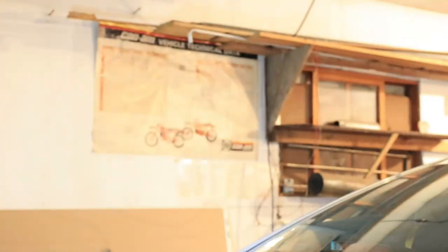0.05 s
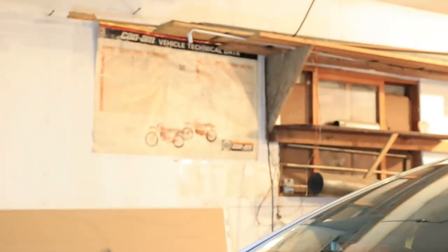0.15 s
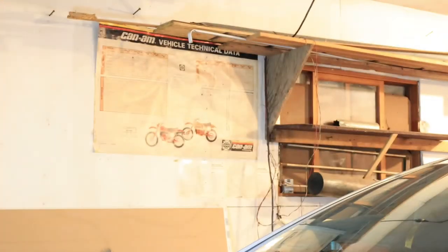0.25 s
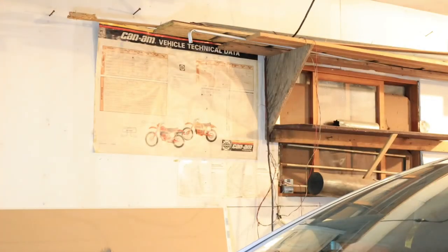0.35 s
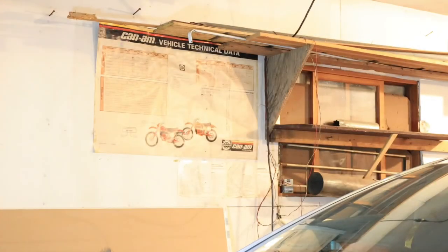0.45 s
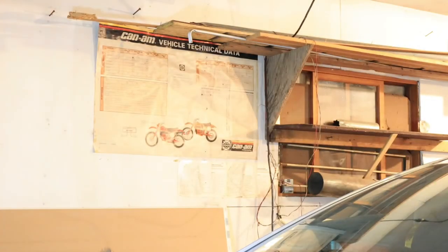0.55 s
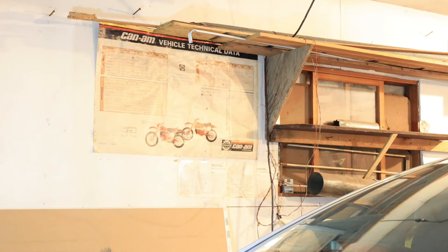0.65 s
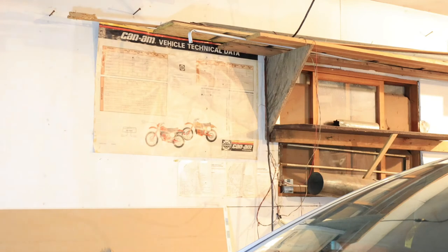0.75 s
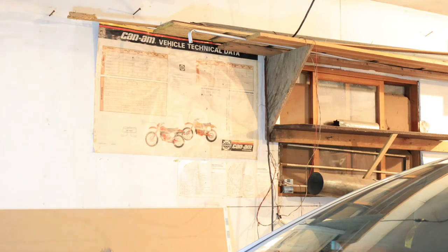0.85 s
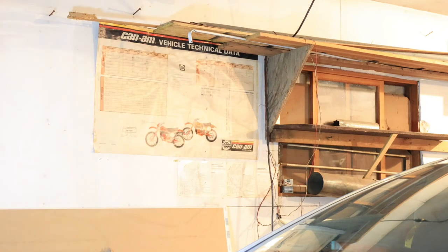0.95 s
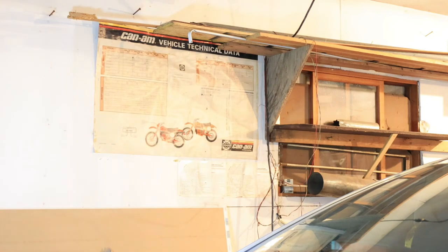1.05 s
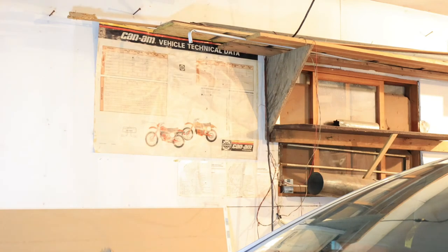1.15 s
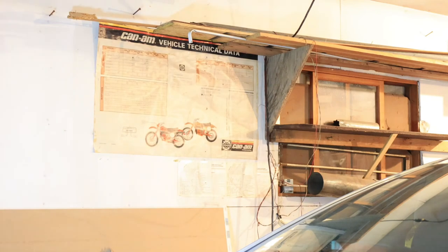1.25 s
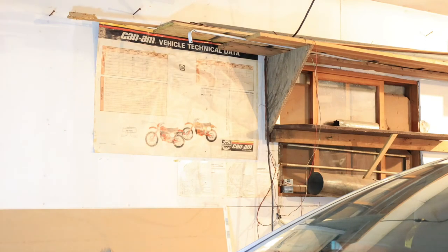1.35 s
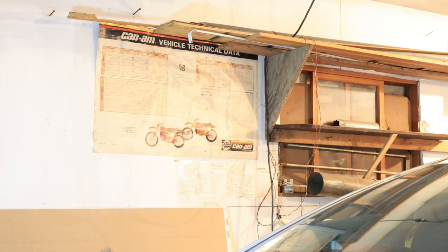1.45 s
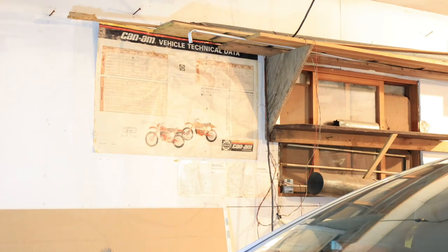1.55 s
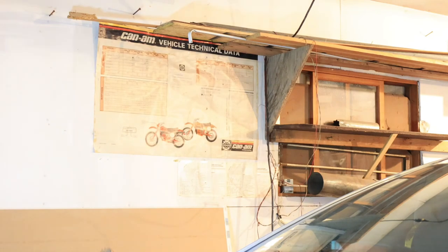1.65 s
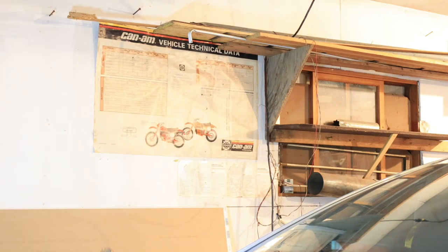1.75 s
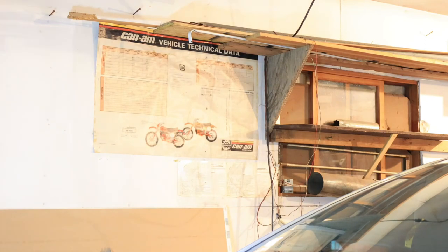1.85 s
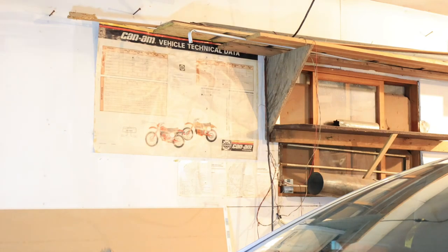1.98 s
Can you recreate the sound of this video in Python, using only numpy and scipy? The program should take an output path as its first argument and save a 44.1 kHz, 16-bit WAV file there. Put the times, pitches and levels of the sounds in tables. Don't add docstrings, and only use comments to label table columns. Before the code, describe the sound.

A car trunk lid falls with a faint airy rush and a tiny hinge tick, then slams at about 0.2 s: deep thud, hard latch clunk, boomy trapped air. Loose trim rattles in quick pairs until about 0.5 s while panels and the hard-walled garage ring out by 1 s. Afterwards, quiet street murmur, distant engine hum, faint blurred birds and tiny rustles. Left channel only; right holds faint hiss.

```python
import sys
import numpy as np
from scipy import signal
from scipy.fft import rfft, irfft
from scipy.io import wavfile
from scipy.ndimage import uniform_filter1d

SR = 44100
rng = np.random.default_rng(int(sys.argv[2]) if len(sys.argv) > 2 else 0)


def digitize_waveform(pressure):
    field = np.atleast_2d(pressure).T
    bounded = np.clip(field, -1, 1)
    quanta = np.round(bounded * 32767).astype(np.int16)
    wavfile.write(sys.argv[1], SR, quanta)


def gain_from_decibels(decibels):
    exponent = np.asarray(decibels, float) / 20
    return 10 ** exponent


N = 88200
T = np.arange(N) / SR
FREQS = np.maximum(np.fft.rfftfreq(N, 1 / SR), 1)


def unit(x):
    return x / np.sqrt(np.mean(x ** 2))


def colour(x, points):
    hz, db = np.array(points, float).T
    gain = gain_from_decibels(np.interp(np.log(FREQS), np.log(hz), db))
    return irfft(rfft(x) * gain, N)


def noise(points):
    return unit(colour(rng.standard_normal(N), points))


def narrow(hz, width_hz):
    resonance = 1 + ((FREQS - hz) / (width_hz / 2)) ** 2
    return unit(irfft(rfft(rng.standard_normal(N)) / resonance, N))


def walk(rate_hz):
    size = int(SR / rate_hz)
    wander = uniform_filter1d(uniform_filter1d(rng.standard_normal(N), size), size)
    return wander / wander.std()


def follow(points):
    times, db = np.array(points, float).T
    return np.interp(T, times, db)


def fade(start, t60, rise):
    since = np.maximum(T - start, 0)
    return (1 - np.exp(-since / rise)) * gain_from_decibels(-60 * since / t60)


def ring(modes):
    return sum(gain_from_decibels(db) * np.sin(2 * np.pi * hz * T) * gain_from_decibels(-60 * T / t60) for hz, db, t60 in modes)


def conv(a, b):
    return signal.fftconvolve(a, b)[:N]


# pitch_hz, level_db (per Hz)
MURMUR = [(15, -51.5), (25, -10.5), (86, -8.5), (194, -10.5), (236, -17), (364, -14.5), (464, -17),
          (1310, -24.5), (8000, -45), (10400, -64.5), (17600, -120)]
# start_s, level_db
MURMUR_SWELL = [(0, 3.5), (.8, 8.5), (0.999, 3), (1.2, -0.5), (1.45, -2.5), (1.649, 3.5), (1.8, -0.5),
                (2, 0)]


def street_murmur():
    return noise(MURMUR) * gain_from_decibels(-65 + follow(MURMUR_SWELL) + 1.1 * walk(12))


# start_s, level_db
ENGINE_HUM = [(0, -85.5), (.45, -80), (.62, -62), (.95, -69.5), (1.2, -78.5), (1.44, -67), (1.6, -75),
              (1.68, -68), (1.8, -62.5), (1.93, -71), (2, -74)]


def engine_hum():
    return narrow(83, 14) * gain_from_decibels(follow(ENGINE_HUM) + 4)


# pitch_hz, level_db, width_hz
BIRD_NOTES = [(3610, -64.5, 510), (4360, -69, 800), (1830, -62, 350), (1330, -60, 217), (535, -56, 150),
              (556, -53.5, 82), (308, -58, 112), (4100, -68, 310), (3750, -71, 300), (3230, -69.5, 340),
              (2600, -72.5, 640), (1152, -70.5, 900), (280, -58.5, 240), (187, -57.5, 78), (1320, -62, 127),
              (526, -41, 220), (670, -43, 53), (166, -49, 70)]
# start_s, length_s
BIRD_SPANS = [(.66, .3), (.68, .27), (.789, .12), (.808, .1), (.785, .09), (.968, .05), (1.612, .045),
              (1.769, .07), (1.783, .12), (1.805, .11), (.7, .2), (1.6, .12), (.783, .03), (.99, .1),
              (.96, .09), (.485, .17), (.52, .07), (.52, .07)]


def birds():
    rise_s, flutter_db = 0.006, 1.5
    out = 0
    for (start, length), (hz, db, width_hz) in zip(BIRD_SPANS, BIRD_NOTES):
        flutter = gain_from_decibels(db + flutter_db * walk(29.6))
        release = np.clip((start + length - T) / (3 * rise_s), 0, 1)
        out = out + flutter * narrow(hz, width_hz) * fade(start, length * 7, rise_s) * release
    return out


# pitch_hz, t60_s
ROOM_DECAY = [(30, 0.76), (120, 0.31), (200, 0.6), (400, 0.7), (1500, 0.75), (4000, 0.67), (8000, 0.16),
              (15000, 0.3)]


def garage():
    hz_points, t60_points = np.array(ROOM_DECAY).T
    spectrum = rfft(rng.standard_normal(N))
    tail = 0
    for hz in 25 * 2 ** np.arange(0, 9.5, 0.5):
        weight = np.maximum(1 - abs(np.log2(FREQS / hz)) * 2, 0)
        t60 = np.interp(np.log(hz), np.log(hz_points), t60_points)
        tail = tail + irfft(spectrum * weight, N) * fade(0.0033, t60, 0.01)
    return tail / np.linalg.norm(tail)


# start_s, level_db
LID_FALL = [
    (0.0, -60),
    (0.022, -63),
    (0.042, -61.5),
    (0.148, -53),
    (0.16, -52.5),
]
# pitch_hz, width_hz, level_db
LID_AIR = [(300, 900, 4), (900, 1200, 1.5), (1700, 490, -11.5), (2290, 570, -9), (3320, 1000, -2.5),
           (4000, 280, -18)]


def falling_lid():
    air = unit(sum(gain_from_decibels(db) * narrow(hz, width_hz) for hz, width_hz, db in LID_AIR))
    stop = np.clip((0.19 - T) / 0.027, 0, 1)
    knock = gain_from_decibels(-48.5 - 60 * T / 0.36) * np.sin(2 * np.pi * 124 * T - 1.6)
    return air * gain_from_decibels(follow(LID_FALL) + 0.5) * stop + knock


# start_s, level_db (peak), t60_s
TICK_TIMES = [
    (0.043, -48.5, 0.036),
    (1.987, -58.5, 0.028),
]
# pitch_hz, level_db (per Hz)
TICK_COLOUR = [(1500, -25.5), (3000, 3), (4200, 2.5), (5500, -15), (7500, -6.5), (15000, -11)]


def ticks():
    return noise(TICK_COLOUR) * sum(gain_from_decibels(db) * fade(s, t60, 0.0003) for s, db, t60 in TICK_TIMES)


# pitch_hz, width_hz, level_db, t60_s
AFTERRING_BANDS = [(165, 30, -25, .7), (255, 40, -25.5, .85), (514, 50, -29, .9), (660, 130, -32.5, .85),
                   (895, 50, -33.5, 1), (1036, 45, -35.5, .7), (72, 15, -28.5, 0.46)]


def afterring():
    return sum(gain_from_decibels(db) * narrow(hz, width_hz) * fade(0.13, t60, 0.06)
               for hz, width_hz, db, t60 in AFTERRING_BANDS)


# pitch_hz, level_db, rise_s, t60_s
CAVITIES = [(30.3, -9.5, .03, 0.33), (62.2, -19.5, 0.024, 0.43), (118.37, -18.5, 0.02, 0.47),
            (168.84, -6.5, .08, 0.28), (250, -10.5, 0.059, .25), (345, -11, 0.03, 0.18),
            (406.6, -15.5, 0.033, 0.2)]


def cavity_boom():
    out = 0
    for hz, db, rise, t60 in CAVITIES:
        tone = np.sin(2 * np.pi * hz * T + 0.43 * walk(13))
        out = out + gain_from_decibels(db) * fade(0.18, t60, rise) * tone
    return out


# pitch_hz, level_db (per Hz)
SHUDDER_COLOUR = [(25, -21.5), (100, -13), (200, -8), (400, -11), (691, -20), (856, -14.5), (3630, -28),
                  (15000, -58.5)]


def panel_shudder():
    roughness = gain_from_decibels(-14 + 2 * walk(84))
    return noise(SHUDDER_COLOUR) * roughness * fade(0.181, 0.45, 0.0089)


# start_s, level_db (peak), rise_s, t60_s, brightness_db
LATCH_CRACKS = [(0.1642, -36, 0.0017, .06, -21.5), (.169, -37.5, 0.0067, .08, -6.5),
                (.178, -15.5, 0.0034, 0.033, -8.5), (.1855, -11.5, .0015, .035, 6.5),
                (.192, -23.5, 0.0014, 0.05, -0.5), (.200, -16.5, 0.0053, 0.034, 7.5),
                (.211, -21.5, .002, 0.075, 1), (.2412, -18.5, 0.00097, 0.035, 11),
                (.254, -24, .001, 0.012, 6), (.2962, -20.5, .0006, 0.022, 10),
                (.306, -27.5, .0006, 0.038, 8.5), (.348, -24, 0.0011, 0.028, 7.5),
                (.3565, -24.5, .001, 0.033, 5), (.396, -34.5, .001, 0.02, 8),
                (.417, -35, 0.0011, 0.027, -20), (.444, -39.5, 0.0012, 0.017, 2.5),
                (.485, -43.5, .001, 0.031, 4.5), (0.5221, -47, 0.00062, 0.023, 4.5),
                (0.527, -41.5, 0.0026, 0.052, -4.5), (.975, -56, 0.0097, 0.12, 7.5),
                (1.10, -64.5, 0.0089, 0.0908, -9), (1.265, -65.5, 0.0088, 0.14, -1),
                (1.52, -65, 0.0083, 0.048, -15), (1.69, -69.5, 0.0078, 0.097, 5)]
# pitch_hz, level_db (per Hz)
CRACK_COLOUR = [(200, -2), (650, 1), (1200, 0), (2800, -1), (4300, -8.5), (6000, -19.5), (10000, -30),
                (15000, -43.5)]
# pitch_hz, level_db, t60_s (when free)
TRIM_MODES = [(1230, -5.5, 0.56), (1453, -37, 5.0), (1561.6, -1.5, 0.48), (2156, 4.5, 0.69),
              (2636, -7, 0.62), (3370, -20, 1.7), (3830, 4, 1.3), (3840, 2.5, 1.2), (7235, -22, 0.46),
              (8200, -22, 0.67)]


def latch_and_trim():
    grit = noise(CRACK_COLOUR)
    high = signal.sosfilt(signal.butter(2, 4500, "high", fs=SR, output="sos"), grit)
    cracks = 0
    for start, db, rise, t60, bright_db in LATCH_CRACKS:
        crack = grit + (gain_from_decibels(bright_db) - 1) * high
        cracks = cracks + gain_from_decibels(db + 5) * fade(start, t60, rise) * crack
    trim = ring([(hz, db, 0.013) for hz, db, _ in TRIM_MODES])
    return cracks + gain_from_decibels(-15.5) * conv(cracks, trim / np.linalg.norm(trim))


# start_s, level_db, contact_s, direction (sign and share)
SHELL_PUSHES = [(0.163, -36, 0.0011, -1.6), (0.1673, -35, 0.0038, 1), (0.186, -25.5, 0.00031, 0.37),
                (0.1895, -17.5, 0.0024, 0.61), (0.2051, -13.5, 0.0025, -1), (0.2069, -10.5, 0.003, 0.36),
                (0.2146, -5, 0.0024, 0.65), (0.2166, -11, 0.0017, -1), (0.2182, -10, 0.003, 1),
                (0.228, -10.5, 0.0033, -0.84), (0.2386, -8.5, 0.0018, 0.88), (0.2403, -8, .0025, -1),
                (0.2437, -8, 0.0019, 0.83), (0.2464, -16, .004, -1), (.264, -21.5, 0.0026, -0.65),
                (.2728, -8.5, 0.0035, 0.93), (0.2756, -14, .0035, -0.91), (0.2792, -19, 0.004, 0.9),
                (.300, -18, 0.0022, -0.77), (.325, -21.5, .012, 0.99), (0.353, -20.5, 0.016, -1.1),
                (0.791, -49, 0.0022, 0.99), (0.997, -46, 0.005, 0.87)]
# pitch_hz, level_db, t60_s (before damping)
SHELL_MODES = [(32.3, -2, 0.2), (75, -24, 5.0), (160.7, -0.5, 1.1), (258, -6, 0.4), (325, -17.5, 0.64),
               (374, -9, 0.7), (380, -26, 0.78), (550, -12.5, 0.78), (507, -3, 0.25), (603, -20.5, 1.0),
               (730, -16, 0.17), (870, -15, 1.1), (1030, -20, 5.0), (1152, -21.5, 0.43)]


def body_thuds():
    force = 0
    for start, db, contact, direction in SHELL_PUSHES:
        pulse = np.sin(np.pi * np.clip((T - start) / contact, 0, 1)) ** 2
        force = force + direction * gain_from_decibels(db) * pulse
    shell = ring([(hz, db, min(t60 * 0.1, 0.52)) for hz, db, t60 in SHELL_MODES])
    pressure = force - uniform_filter1d(force, size=330)
    return gain_from_decibels(-48) * conv(force, shell) - gain_from_decibels(4.5) * pressure


def scene():
    lid = ticks() + cavity_boom() + panel_shudder() + latch_and_trim() + body_thuds()
    room = gain_from_decibels(-11) * conv(lid, garage())
    background = street_murmur() + engine_hum() + birds()
    left = background + room + falling_lid() + afterring() + lid
    return np.array([left, 0 * left])


# pitch_hz, level_db (per Hz)
HISS_COLOUR = [(30, 10), (300, 6.5), (1500, 0.5), (5000, -2), (16000, -9)]
# pitch_hz, level_db
CROSSTALK_CURVE = [(30, -37.5), (110, -37.5), (380, -51), (1300, -62.5), (4000, -64.5), (15000, -63)]


def preamp(left):
    hiss = np.array([noise(HISS_COLOUR), noise(HISS_COLOUR)])
    return np.array([left, colour(left, CROSSTALK_CURVE)]) + gain_from_decibels(-74) * hiss


def roll_off(x):
    return signal.sosfilt(signal.butter(12, 15780, fs=SR, output="sos"), x)


def record(dry):
    left = signal.sosfilt(signal.butter(2, 23, "high", fs=SR, output="sos"), dry[0])
    mix = np.clip(preamp(left), -1, 1)
    return roll_off(mix)


dry = scene()
out = record(dry)
digitize_waveform(out)
```